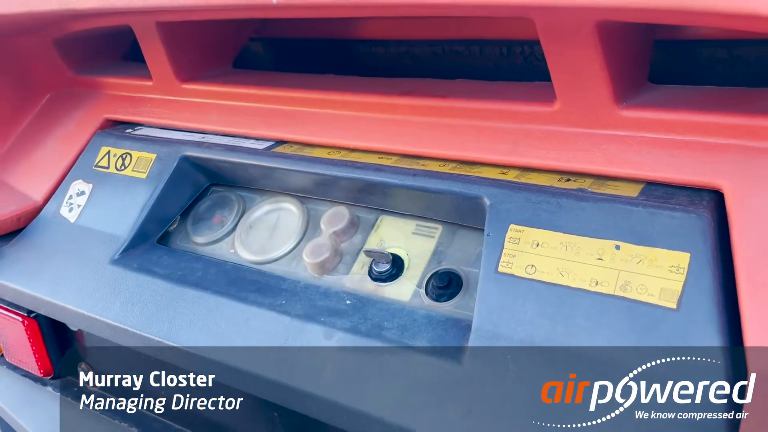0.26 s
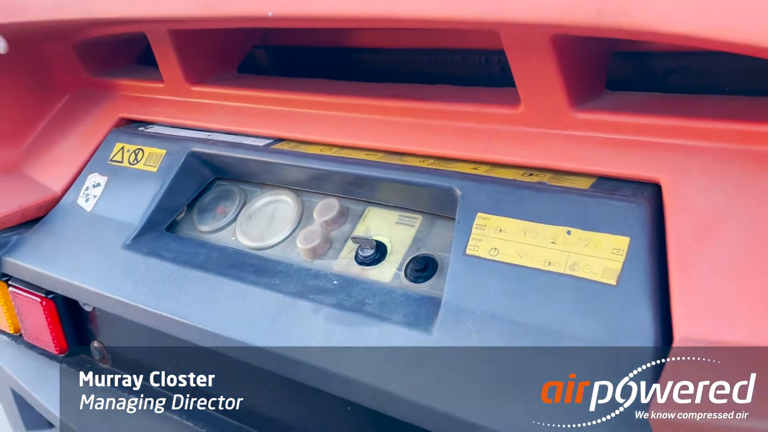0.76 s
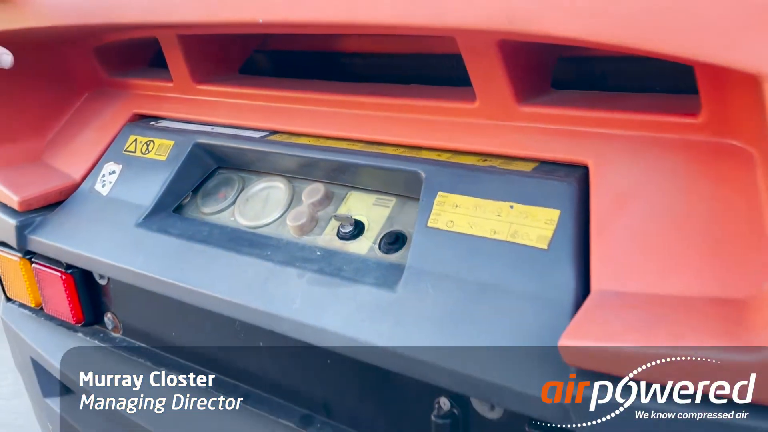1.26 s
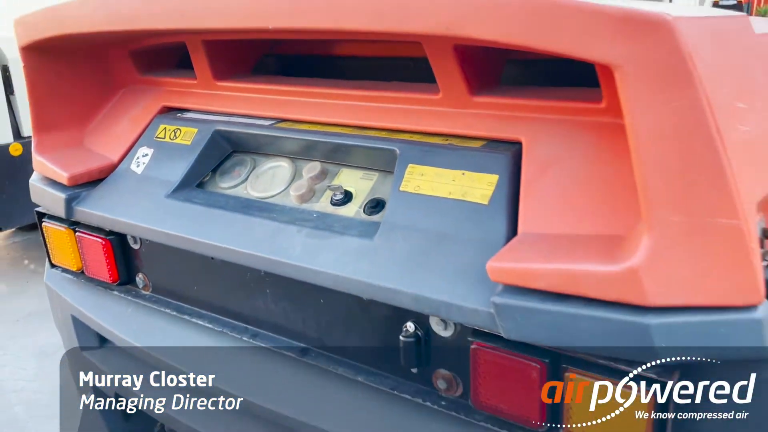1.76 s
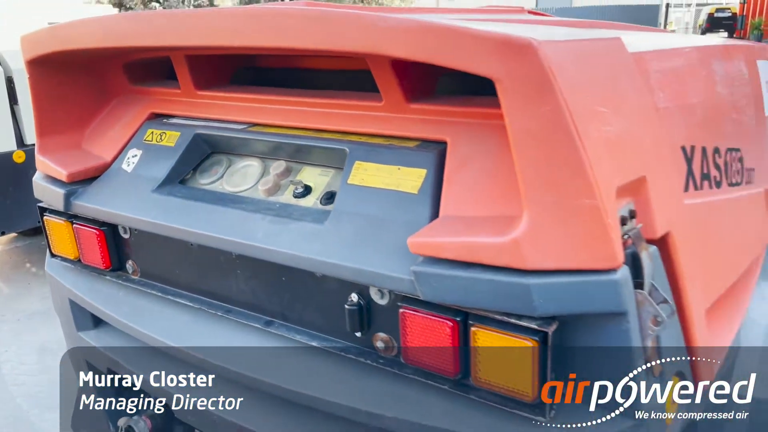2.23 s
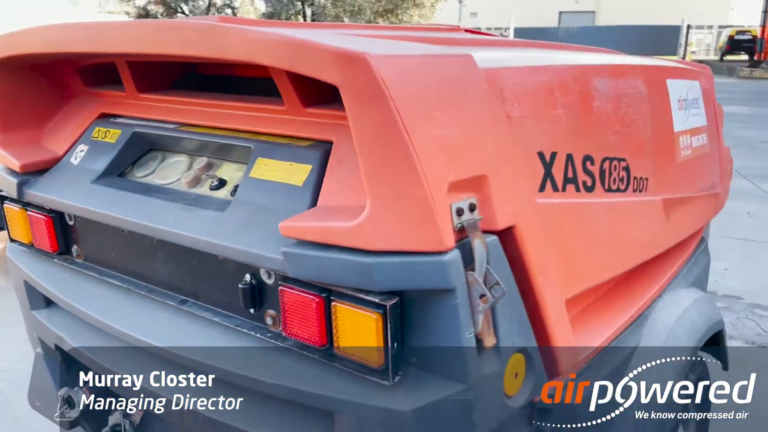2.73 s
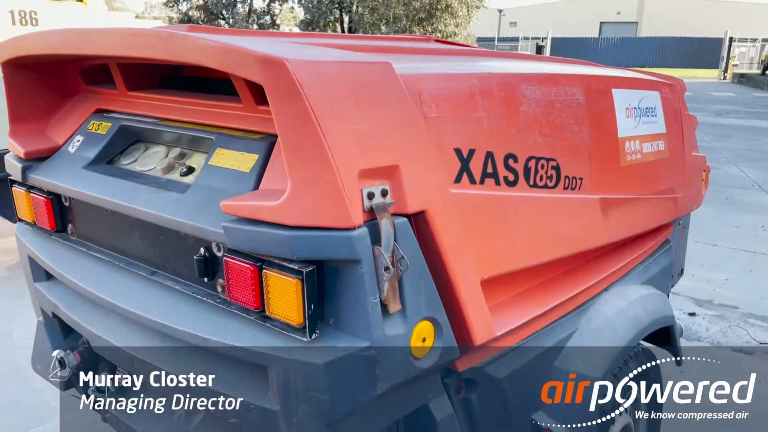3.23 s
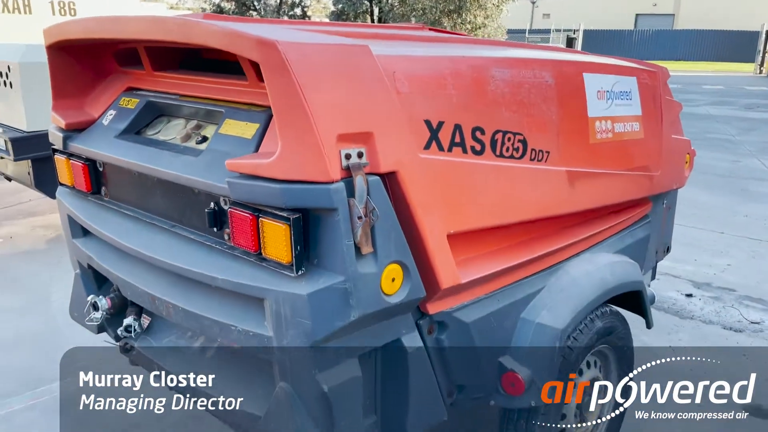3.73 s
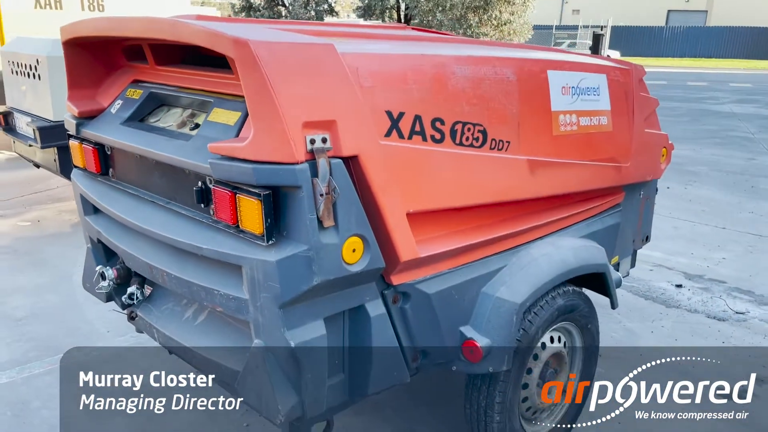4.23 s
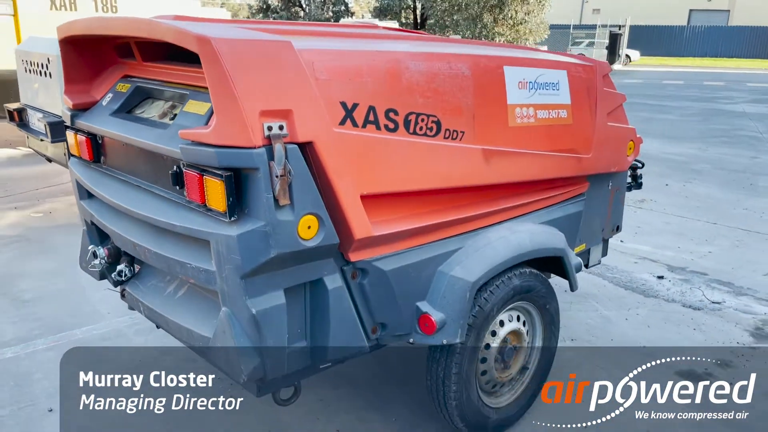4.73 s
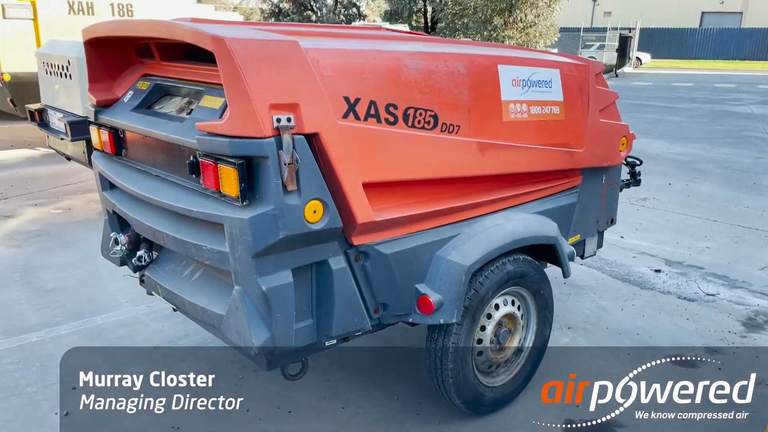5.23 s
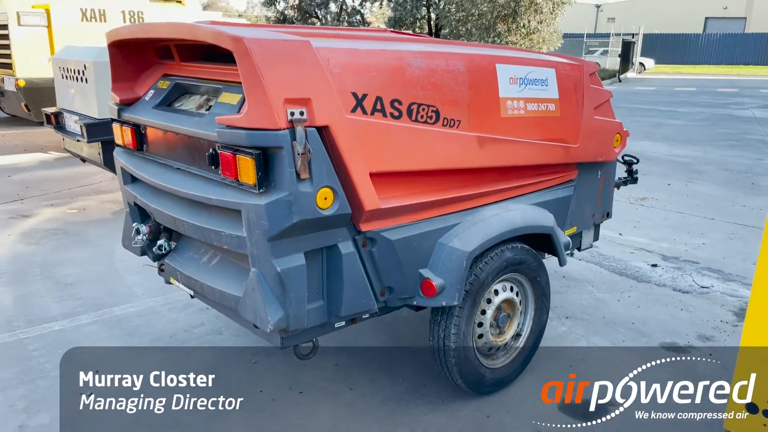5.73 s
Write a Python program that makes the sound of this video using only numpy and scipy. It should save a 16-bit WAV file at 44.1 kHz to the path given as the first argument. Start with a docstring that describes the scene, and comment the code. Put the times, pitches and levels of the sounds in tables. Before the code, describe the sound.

A diesel engine runs steadily inside a towable compressor in an open yard: a low drone, clattering panels, hissing air and a fast, bright tick. Wind buffets the close microphone. Just after one second come two low knocks, then the tick softens as the microphone backs away. A loose part snaps faintly four times around the middle. The wind drops, then returns near the end.

```python
"""A three-cylinder diesel idles inside the canopy of a towable compressor in an open yard.
It opens at the control panel: exhaust drone, clatter ringing the panels, cooling-air hiss, a rap for each
firing and a bright valve tick once a cycle, while gusts thump on the two microphone ports. Just after 1 s
come two low knocks that sink in pitch. The listener steps back and the tick softens; from 3.2 s a loose
part snaps four times. By 4 s the listener stands beside the wheel, in a lull; near 5 s the wind returns."""
import sys
import numpy as np
from scipy import signal
from scipy.fft import rfft, irfft, next_fast_len
from scipy.io import wavfile

SR = 44100
rng = np.random.default_rng(int(sys.argv[2]) if len(sys.argv) > 2 else 0)


def dump_mix(stems):
    """Bounce the given channels to the path in sys.argv[1] as a 16-bit WAV at rate SR."""
    frames = np.atleast_2d(stems).T  # one column per channel
    limited = np.clip(frames, -1, 1)  # hard clip at full scale
    pcm = np.round(limited * 32767).astype(np.int16)
    wavfile.write(sys.argv[1], SR, pcm)


N = 263718
SECONDS = np.arange(N) / SR
FFT_SIZE = next_fast_len(N, True)
BIN_HZ = np.maximum(np.arange(FFT_SIZE // 2 + 1) * SR / FFT_SIZE, 1)
START_RPM, RUN_RPM, SETTLE_S = 1837.6, 1865.8, 2.25
PLACES = [0, 1, 2]   # at the panel, stepping back, beside the wheel
DELAY_PER_PLACE_S = .45 / 343   # each place adds 0.45 m of air

# how alike the two microphone ports sound: f/Hz, likeness/0-1
PORT_LIKENESS = [(95, 1), (130, 0.9), (300, 0.87), (600, .74), (1000, 0.72), (1500, 0.6), (3200, .55),
                 (4500, 0.3), (6500, .9), (7500, 0.85), (8500, 1), (12000, 0.75), (14000, 1)]
# balance of the ports: f/Hz, left over right/dB
PORT_TILT = [(60, 1.3), (110, 0.2), (200, 1.2), (380, 1), (700, 1.6), (1290, 2.5), (2380, -1.2),
             (4400, 3.5), (8120, -0.5), (15000, -.3)]


def amp(db):
    return 10 ** (np.asarray(db) / 20)


def unit_rms(x):
    return x / np.sqrt(np.mean(x ** 2) + 1e-20)


def in_time(rows):
    """One automation curve for each column after t/s."""
    times, *columns = np.transpose(rows)
    return [np.interp(SECONDS, times, column) for column in columns]


def at_hz(points, hz):
    """Read a curve along a log frequency axis."""
    freqs, values = np.transpose(points)
    return np.interp(np.log(hz), np.log(np.maximum(freqs, 1)), values)


def colour(x, spectrum):
    """Equalise to a spectrum, at unit RMS."""
    return unit_rms(irfft(rfft(x, FFT_SIZE) * amp(at_hz(spectrum, BIN_HZ)), FFT_SIZE)[:N])


def band_noise(low_hz, high_hz):
    band = signal.butter(4, [low_hz, high_hz], "band", fs=SR, output="sos")
    return unit_rms(signal.sosfilt(band, rng.standard_normal(N)))


def drift(rate_hz):
    """Smooth random wander of spread about 1: knots joined by half cosines."""
    knots, position = rng.standard_normal(int(N / SR * rate_hz) + 3), SECONDS[::32] * rate_hz
    step = position.astype(int)
    blend = (1 - np.cos(np.pi * (position - step))) / 2
    return np.interp(SECONDS, SECONDS[::32], knots[step] + blend * (knots[step + 1] - knots[step]))


def burst(at, level_db, sharp_s, tail_s, tail_db):
    """Envelope of a sharp crack with a softer tail at each sample index."""
    hits = np.zeros((2, N))
    hits[:, at] = amp(level_db), amp(level_db + tail_db)
    return sum(signal.lfilter([1], [1, -np.exp(-1 / (decay_s * SR))], hit + 1e-18)
               for hit, decay_s in zip(hits, (sharp_s, tail_s)))


def ports(shared, left, right):
    """Each port hears a common part plus its own, shifted in phase and balance."""
    # phase between the ports: f/Hz, left lead/rad
    lead = [(100, 0), (780, .3), (1640, -.2), (2930, 1.0), (4910, .5), (5340, .2), (5770, -1.7),
            (6800, -1.0), (7580, -2.7), (8700, -3.15), (9300, -3.6), (12300, -5.5), (13100, -6.28),
            (15300, -6.28)]
    alike = np.clip(at_hz(PORT_LIKENESS, BIN_HZ), 0, 1)
    pan = amp(at_hz(PORT_TILT, BIN_HZ) / 2) * np.exp(.5j * at_hz(lead, BIN_HZ))
    both = np.sqrt(alike) * rfft(shared, FFT_SIZE) + np.sqrt(1 - alike) * rfft([left, right], FFT_SIZE)
    return irfft(both * [pan, 1 / pan], FFT_SIZE)[:, :N]


def exhaust(cycle, place):
    """The drone: each engine order is a sine on the crank angle, wavering in level and most in phase."""
    # engine orders at each place: multiple of the four-stroke cycle, level/dB
    at_panel = [(1, -26), (2, -28), (3, -0.5), (4, -15), (5, -15), (6, -5.5), (7, -35), (8, -14), (9, -6),
                (10, -9.5), (11, -23), (12, -5.5), (13, -10.5), (14, -15.5), (15, -8.5), (16, -23),
                (17, -29), (18, -22), (19, -16.5), (20, -16), (21, -11), (22, -11), (23, -18.5), (24, -12),
                (25, -20.5), (26, -14), (27, -21), (28, -25), (29, -18), (30, -18)]
    stepping_back = [(1, -36), (2, -38), (3, 0.5), (4, -19), (5, -21), (6, -4), (7, -15.5), (8, -21.5),
                     (9, -15), (10, -20.5), (11, -26.5), (12, -21.5), (13, -15.5), (14, -18.5), (15, -10),
                     (16, -14), (17, -34), (18, -18.5), (19, -36), (20, -21.5), (21, -27.5), (22, -20.5),
                     (23, -24), (24, -25), (25, -21), (26, -24), (27, -26.5), (28, -19), (29, -36),
                     (30, -28)]
    at_wheel = [(1, -55), (2, -29), (3, 0.5), (4, -28), (5, -16.5), (6, -2.5), (7, -17.5), (8, -10.5),
                (9, -22), (10, -20), (11, -18), (12, -21), (13, -12.5), (14, -20), (15, -15.5), (16, -22.5),
                (17, -27.5), (18, -27.5), (19, -23.5), (20, -39), (21, -24.5), (22, -19), (23, -26.5),
                (24, -21), (25, -26.5), (26, -57), (27, -25), (28, -30.5), (29, -37), (30, -23.5)]
    # gear, fan and screw orders: multiple, panel level/dB, stepping-back level/dB, wheel level/dB
    high_orders = [(31, -21, -29, -33), (32, -22, -30, -40), (33, -23, -35, -33), (34, -35, -29, -38),
                   (35, -28, -32, -37), (36, -33, -34, -27), (37, -31, -26, -26), (39, -25, -17.5, -24),
                   (41, -33, -28, -31), (45, -18, -34, -35), (46, -18, -33, -40), (47, -25, -40, -40),
                   (48, -23, -42, -29), (51, -31, -22.5, -30), (57, -30, -27, -32), (58, -26, -25.5, -33),
                   (60, -26, -24, -36), (64, -30, -28, -45), (65, -22, -29, -34), (66, -30, -28, -33),
                   (69, -28, -33, -28), (70, -35, -32, -36), (77, -41, -40, -33), (80, -29, -35, -54),
                   (88, -19, -39, -35), (108, -33, -38, -36)]
    # firing harmonics: multiple -> lead/rad at each place
    firing_leads = {6: [.8, 1.0, 1.2], 9: [.8, -.4, -3.4], 12: [-2.1, -1.4, -.3]}
    bus_db, drum_lead_rad = -14.5, 1.3
    knock_at, low_boom_at, high_boom_at = .6, .75, .21   # shares of the cycle
    low = np.array([at_panel, stepping_back, at_wheel])
    low_orders = np.c_[low[0, :, 0], low[:, :, 1].T]
    cycle, place = cycle[::4], place[::4]   # all orders lie low: a quarter of the rate will do
    lag_rad = np.interp(place, PLACES, [.4, 1.1, 1.8])
    out = np.zeros((2, len(cycle)))
    for order, *levels in np.vstack([low_orders, high_orders]):
        phase = 2 * np.pi * order * cycle
        if order in firing_leads:
            phase += np.interp(place, PLACES, firing_leads[order])
        elif 23 <= order <= 26 or 45 <= order <= 48:   # two panels boom once a cycle
            boom_at = low_boom_at if order < 30 else high_boom_at
            phase += -2 * np.pi * order * boom_at + .3 * drift(2)[::4]
        elif order in (10, 20, 21, 22):   # the canopy drums as the cycle starts
            phase += drum_lead_rad - lag_rad + .3 * drift(2)[::4]
        elif order in (7, 8) or 13 <= order <= 17:   # one cylinder knocks hardest
            phase += -2 * np.pi * order * knock_at - lag_rad + .3 * drift(2)[::4]
        elif order != 3:   # order 3, the firing rate, stays locked to the crank
            phase += rng.uniform(0, 2 * np.pi) + .085 * np.sqrt(order) * drift(1.963)[::4]
        level_db = bus_db + np.interp(place, PLACES, levels) + .35 * np.sqrt(order) * drift(6)[::4]
        hz = order * cycle[-1] * SR / N
        apart = np.arccos(np.clip(at_hz(PORT_LIKENESS, hz), 0, 1)) * rng.choice([-.5, .5])
        tilt = amp(at_hz(PORT_TILT, hz) / 2)
        out += np.sqrt(2) * amp(level_db) * np.cos(phase + [[apart], [-apart]]) * [[tilt], [1 / tilt]]
    return signal.resample_poly(out, up=4, down=1, axis=1)[:, :N]


def contacts(cycle, carry_over, uneven_db):
    """A random pattern of hard and soft contacts, looped every cycle and slowly renewed."""
    # hardest contacts of the valve gear: share of the cycle, accent level/dB
    accents = [(.18, 2), (.28, 3), (.54, 2), (.64, 1), (.9, -2.5)]
    steps, fade_cycles = 2048, .028
    share = np.arange(steps) / steps
    strength = amp(uneven_db * np.repeat(rng.standard_normal(steps // 32), 32))   # busier crank angles
    strength *= 1 + sum(amp(db) * np.exp(-((share - at) % 1) / fade_cycles) for at, db in accents)
    fresh = strength * rng.standard_normal((int(cycle[-1]) + 40, steps))
    pattern = signal.lfilter([1], [1, -carry_over], fresh, axis=0)[36:].ravel()
    return np.interp((cycle + 1) * steps, np.arange(len(pattern)), pattern)


def clatter(cycle, place):
    """Contacts sound through the block and ring the canopy panels; the mix shifts with the place."""
    # tone of valve gear and pumps: f/Hz, level/dB
    spectrum = [(300, -14), (430, 4), (520, -0.5), (700, -0.5), (1000, 0), (1500, -5.5), (2200, -15),
                (3200, -17.5), (4500, -33), (6000, -34)]
    # canopy panel modes: f/Hz, width/Hz, level at the panel/dB, level at the wheel/dB
    panels = [(604, 51, -3, -5.5), (723, 76, -2, -27), (1100, 130, -12.5, -14), (1363, 24, -3, -17),
              (1660, 85, -20, -1), (2630, 540, -37, 1), (2930, 130, -24, 1), (4870, 280, -5, 15.5)]
    level_db = -25.5 - 2.5 * place
    heard_cycle = cycle - DELAY_PER_PLACE_S * place * RUN_RPM / 120
    layers = []
    for _ in range(3):
        block = colour(contacts(heard_cycle, carry_over=.88, uneven_db=2), spectrum)
        ring = 0
        for hz, width_hz, near_db, far_db in panels:
            r, w = np.exp(-np.pi * width_hz / SR), 2 * np.pi * hz / SR
            gain = (1 - r * r) / 2
            mode = signal.lfilter([gain, 0, -gain], [1, -2 * r * np.cos(w), r * r], block)
            ring += amp(near_db + (far_db - near_db) * place / 2) * mode
        layers.append(block + ring)
    return amp(level_db) * ports(*layers)


def hiss(cycle, place):
    """Combustion and cooling air puff a little with every firing; lows and highs flicker apart."""
    # tone of the hiss: f/Hz, level/dB
    spectrum = [(150, 17.5), (300, 20.5), (600, 12), (1000, 14), (1500, 12), (2200, 7.5), (3200, 1),
                (4500, -1), (5500, -3.5), (6500, -5.5), (8500, 1), (10000, 0), (12000, -5), (15300, -15)]
    # treble lift, strongest right at the vents: t/s, level/dB
    treble = [(0, 2.5), (.5, 2), (.9, 0), (3.3, -0.5), (5.98, 0.1)]
    treble_db, = in_time(treble)
    level_db = -28.5 - .5 * place
    air = ports(*[colour(rng.standard_normal(N), spectrum) for _ in range(3)])
    lows = signal.sosfiltfilt(signal.butter(2, 3500, fs=SR, output="sos"), air)
    puff_db = .39 * np.cos(2 * np.pi * (3 * cycle - .7)) + .35 * drift(14)
    low_db = .98 * drift(14) + .94 * drift(40) + 1.6 * drift(200)
    high_db = treble_db + .85 * drift(14) + .51 * drift(40) + .74 * drift(200)
    return amp(level_db + puff_db) * (amp(low_db) * lows + amp(high_db) * (air - lows))


def wind():
    """Lumpy rumble, partly common to the two ports: a breeze, and gusts that swell and sink."""
    # tone of the wind: f/Hz, level/dB
    spectrum = [(15, -38), (32, -20), (55, -1), (100, 0), (160, -4), (260, -10), (420, -19), (800, -28),
                (1500, -48), (4000, -110)]
    # breeze between the gusts: t/s, level/dB
    breeze = [(0, -26), (.7, -28.5), (1.3, -25.5), (2.2, -27.5), (2.8, -26), (3.3, -33), (3.6, -37),
              (4.7, -37), (5.2, -29.5), (5.98, -27)]
    # gusts on the ports: t/s, level/dB, half length/s
    gusts = [(.09, -22, 0.15), (0.266, -18.5, 0.043), (0.41, -22, 0.076), (0.583, -25, 0.042),
             (0.923, -18, 0.044), (1.16, -20, 0.1), (1.49, -22, 0.06), (1.703, -23, 0.037),
             (1.87, -22.5, 0.044), (2.494, -26, 0.054), (2.72, -20, 0.047), (3.14, -31, 0.061),
             (3.88, -34, 0.1), (5.24, -31, 0.16), (5.65, -31, .06), (5.84, -25.5, 0.13)]
    lumps_db, common = 3, .95
    power = amp(*in_time(breeze)) ** 2
    for t, level_db, half_s in gusts:
        power += (amp(level_db) * np.exp(-((SECONDS - t) / half_s) ** 2)) ** 2
    both, left, right = [
        colour(rng.standard_normal(N), spectrum) * np.sqrt(power) * amp(lumps_db * drift(25))
        for _ in range(3)]
    return (common * both + np.array([left, right])) / np.sqrt(common ** 2 + .5)


def diesel_knock(cycle, place):
    """Every firing raps the block, three to a cycle, some harder than others."""
    rap_at, rap_db, spread_db, jitter_s = .2, -35, 2, .001
    at = np.flatnonzero(np.diff(np.floor(3 * (cycle - rap_at))))
    timing, force = rng.standard_normal((len(at), 2)).T
    delay_s = timing * jitter_s + DELAY_PER_PLACE_S * place[at]
    at = (at + delay_s * SR).astype(int).clip(0, N - 1)
    envelope = burst(at, rap_db + spread_db * force, sharp_s=.004, tail_s=.0095, tail_db=-12.5)
    return ports(*[envelope * band_noise(1000, 2900) for _ in range(3)])


def valve_tick(cycle, place):
    """Once a cycle one valve seats hard and bounces: a bright crack, then its cover rings."""
    # tone of the crack: f/Hz, level/dB
    spectrum = [(900, -8), (1500, 6), (2200, -12), (3200, 5), (4500, -5.5), (6500, -3.5), (8500, 8),
                (10500, 0.5), (12500, 3.5), (15000, -13)]
    # valve cover modes: f/Hz, level/dB, t60/s
    cover = [(720, 1, .04), (1600, -9, .012), (2130, 1.5, .02), (2260, 2.5, .022), (2950, -9, .016),
             (3250, -10, .014), (3700, -16, .01), (4450, -15, .012), (5600, -16, .008), (6750, -13, .015),
             (7050, -12, .018)]
    # tick through the vents, left behind on the walk: t/s, crack/dB, tail re crack/dB, cover ring/dB
    vents = [(0, -23, -10, -39), (.3, -20, -12, -35), (.6, -19, -17, -32), (.75, -21.5, -19, -27),
             (.82, -25, -18, -27), (.94, -28, -16, -27), (1.02, -33, -14, -27.5), (1.15, -35, -12, -35),
             (3.3, -39, -10, -40), (5.98, -42, -10, -39)]
    seat_at, jitter_s, ring_lag_s = .236, .0003, .0018
    bounce_s, bounce_db = .0042, -8
    crack_db, tail_db, ring_db = in_time(vents)
    at = np.flatnonzero(np.diff(np.floor(cycle - seat_at)))
    scatter = rng.standard_normal((len(at), 2 + len(cover)))   # timing, crack level, each mode's level
    delay_s = scatter[:, 0] * jitter_s + DELAY_PER_PLACE_S * place[at]
    at += (delay_s * SR).astype(int)
    force_db = np.repeat([0, bounce_db], len(at))
    at = np.r_[at, at + int(bounce_s * SR)].clip(0, N - 99)
    scatter = np.r_[scatter, scatter[::-1]]
    hit_db = crack_db[at] + force_db + scatter[:, 1]
    envelope = burst(at, hit_db, sharp_s=.0016, tail_s=.015, tail_db=tail_db[at])
    layers = np.array([envelope * colour(rng.standard_normal(N), spectrum) for _ in range(3)])
    for (hz, mode_db, t60), spread in zip(cover, scatter[:, 2:].T):
        path_db = ring_db if hz < 2500 else crack_db   # high modes pass the vents as the crack does
        blows = np.zeros(N)
        blows[at + int(ring_lag_s * SR)] = amp(path_db[at] + force_db + mode_db + 1.5 * spread)
        r, w = amp(-60 / (t60 * SR)), 2 * np.pi * hz / SR
        layers += signal.lfilter([0, np.sin(w)], [1, -2 * r * np.cos(w), r * r], blows + 1e-18)
    return ports(*layers)


def falling_knocks():
    """A few cycles of a saturated sine that start at once, sink in pitch and die."""
    # low knocks: t/s, upper f/Hz (the glide starts 3/4 of the way up to it), final f/Hz, level/dB
    knocks = [(1.2045, 390, 195, -3.5), (1.1335, 230, 130, -8)]
    out = 0
    for t, upper_hz, final_hz, level_db in knocks:
        age = np.clip(SECONDS - t, 0, None)
        turns = final_hz * age + (upper_hz - final_hz) * .0098 * (1 - np.exp(-age / .013))
        envelope = np.tanh(age / .0017) * np.exp(-(age / .019) ** 2)
        out -= amp(level_db) * envelope * np.tanh(1.6 * np.sin(2 * np.pi * turns))
    return out


def snaps():
    """A loose part snaps: short, dull cracks of noise."""
    # cracks of the loose part: t/s, level/dB
    cracks = [(3.193, -31), (3.42, -35), (3.58, -34), (3.707, -27)]
    times, level_db = np.transpose(cracks)
    envelope = burst((times * SR).astype(int), level_db, sharp_s=.001, tail_s=.004, tail_db=-12)
    return envelope * band_noise(1000, 5600)


def scene():
    """The crank speeds up slightly, then holds; every engine layer follows it and the listener's walk."""
    # listener's walk: t/s, place/0-2
    walk = [(0, 0.08), (1.25, 0.23), (2.1, 1.07), (3.3, 1.39), (3.9, 1.945), (5.98, 1.9)]
    place, = in_time(walk)
    rpm = START_RPM + (RUN_RPM - START_RPM) * np.minimum(SECONDS / SETTLE_S, 1)
    cycle = -.0906 + np.cumsum(rpm) / 120 / SR   # a four-stroke cycle is two turns
    engine = sum(layer(cycle, place) for layer in (exhaust, clatter, hiss, valve_tick, diesel_knock))
    return engine + snaps() + falling_knocks() + wind()


def record(dry):
    """Soft saturation rounds the peaks; a steep low-pass cuts the top."""
    ceiling, cutoff_hz = 1.25, 15750
    low_pass = signal.ellip(12, .5, 70, cutoff_hz, fs=SR, output="sos")
    return signal.sosfilt(low_pass, ceiling * np.tanh(dry / ceiling))


dry = scene()
out = record(dry)
dump_mix(out)
```